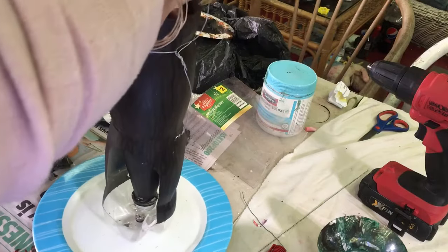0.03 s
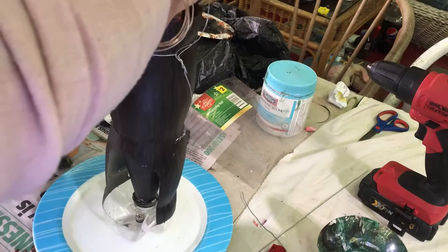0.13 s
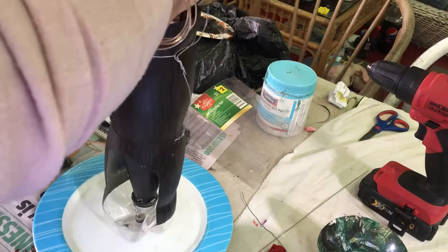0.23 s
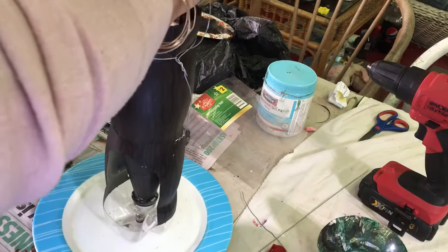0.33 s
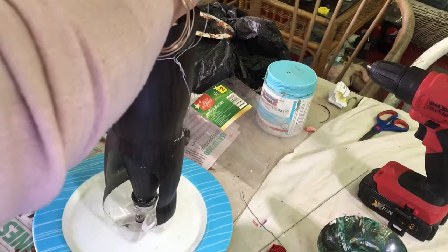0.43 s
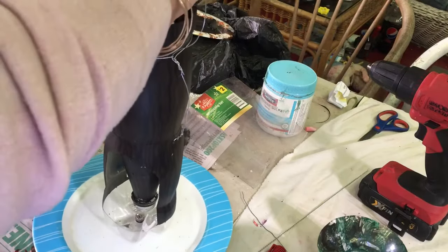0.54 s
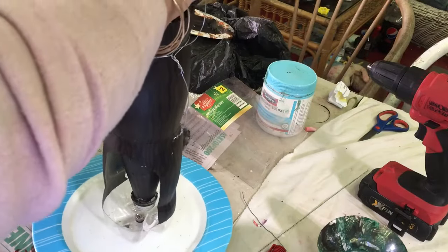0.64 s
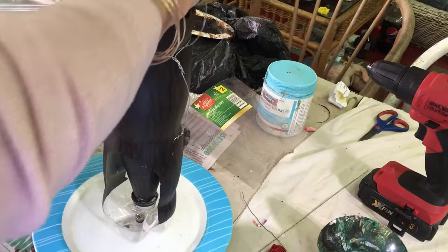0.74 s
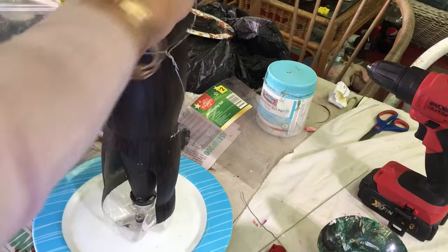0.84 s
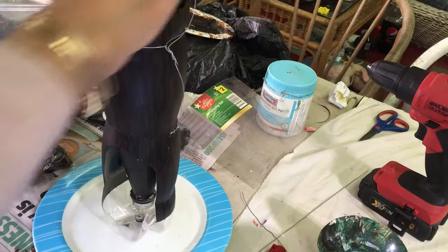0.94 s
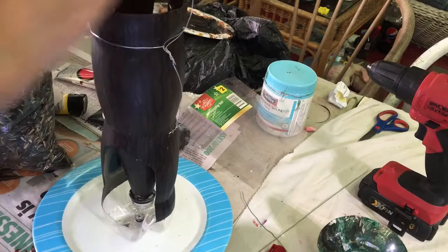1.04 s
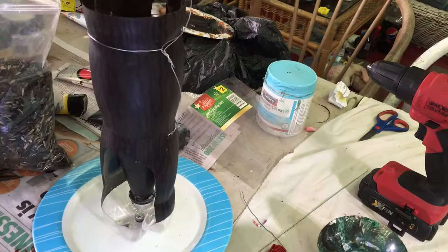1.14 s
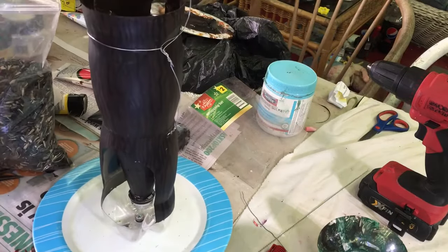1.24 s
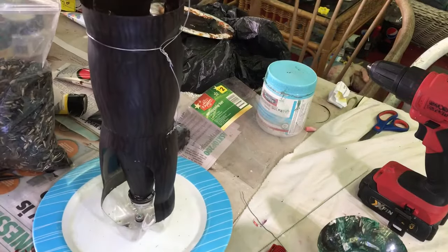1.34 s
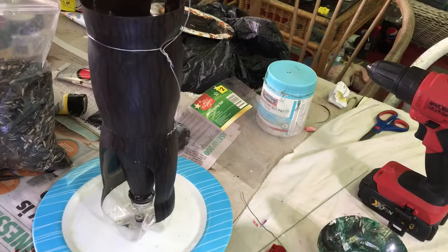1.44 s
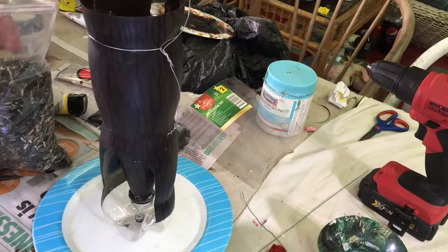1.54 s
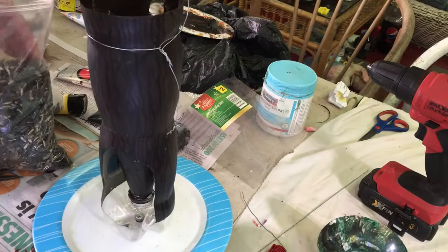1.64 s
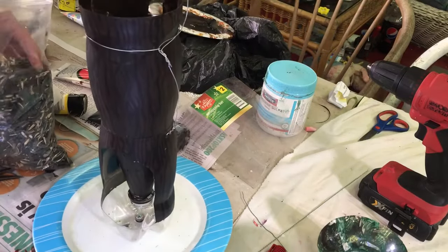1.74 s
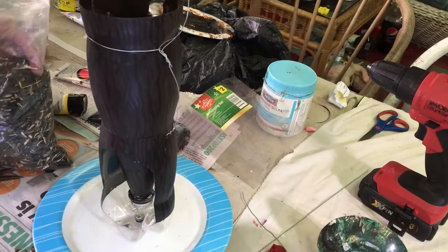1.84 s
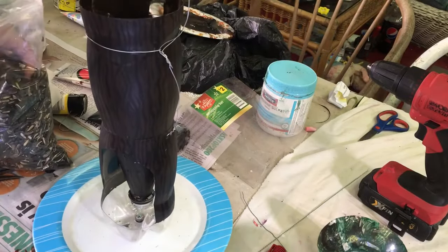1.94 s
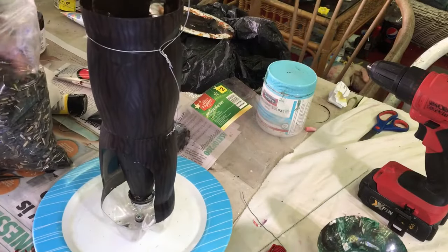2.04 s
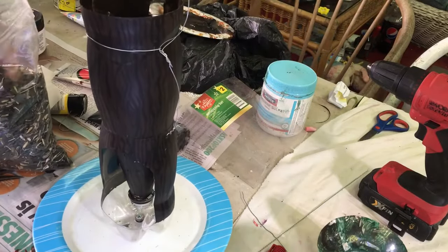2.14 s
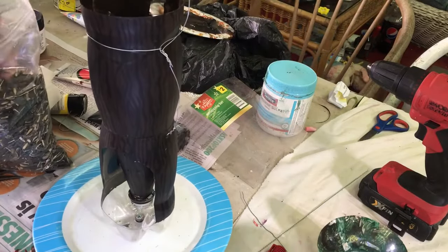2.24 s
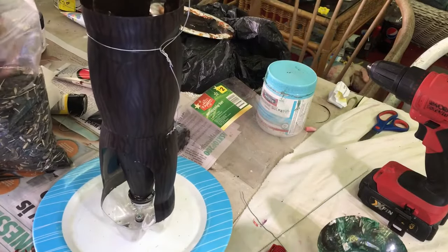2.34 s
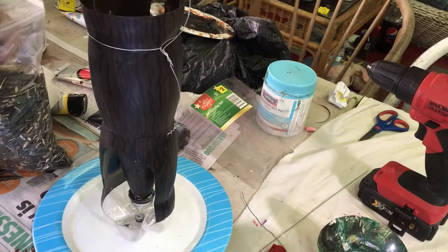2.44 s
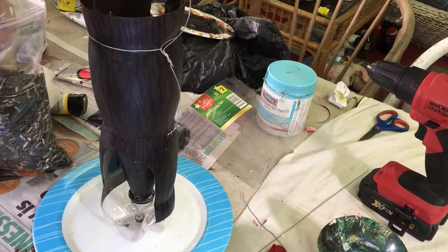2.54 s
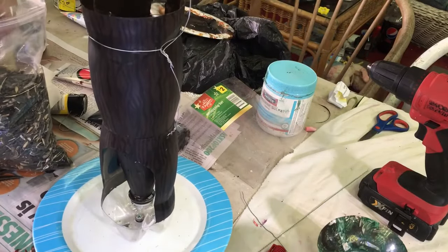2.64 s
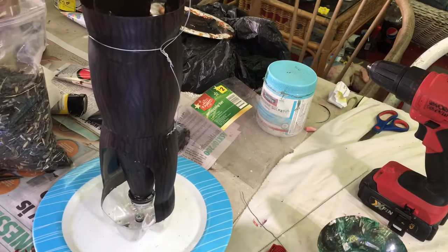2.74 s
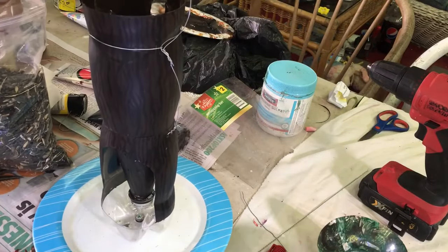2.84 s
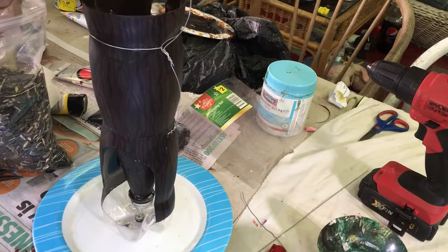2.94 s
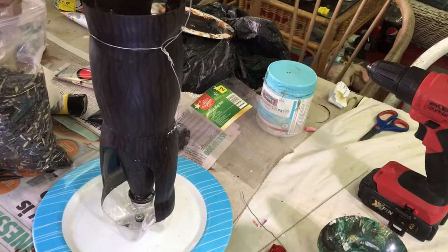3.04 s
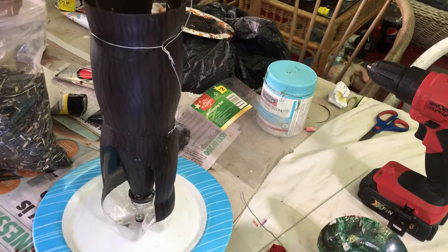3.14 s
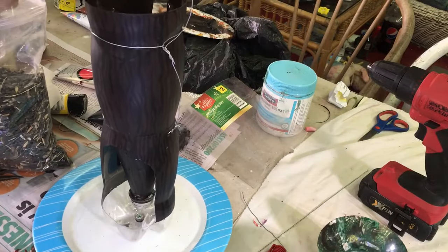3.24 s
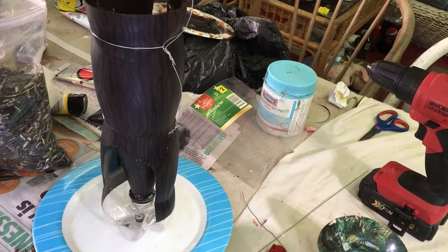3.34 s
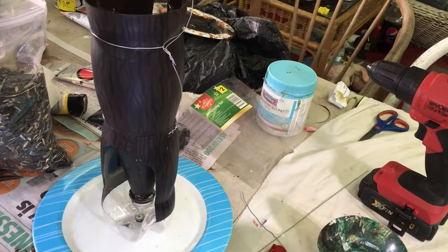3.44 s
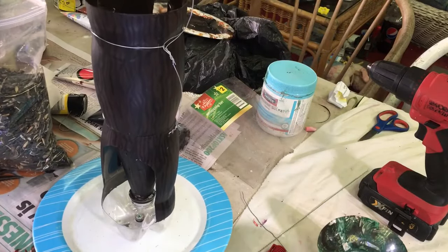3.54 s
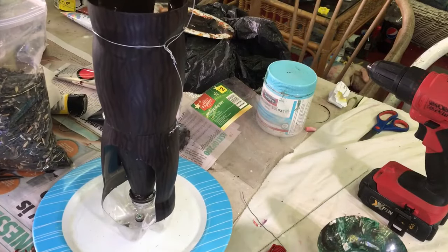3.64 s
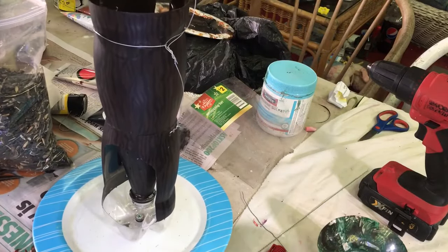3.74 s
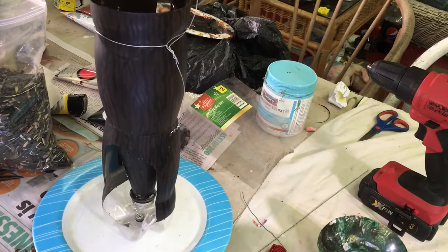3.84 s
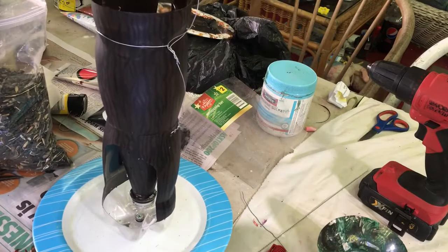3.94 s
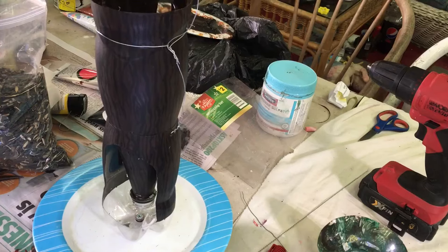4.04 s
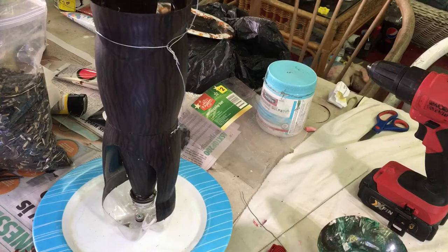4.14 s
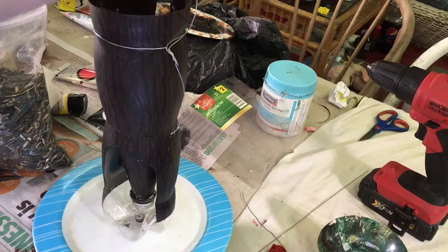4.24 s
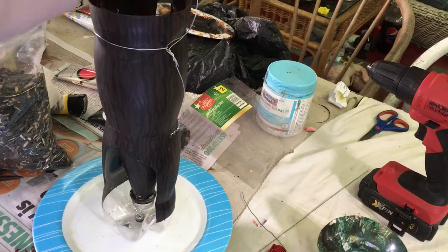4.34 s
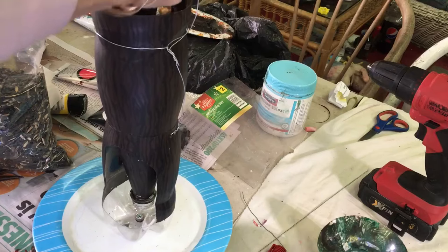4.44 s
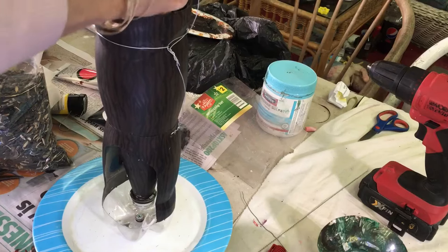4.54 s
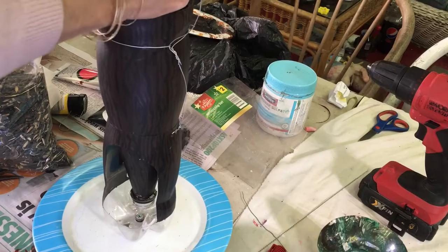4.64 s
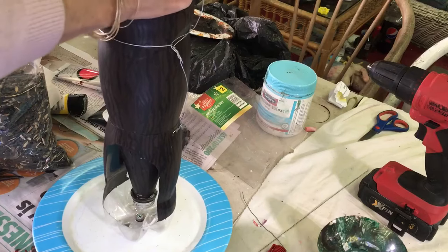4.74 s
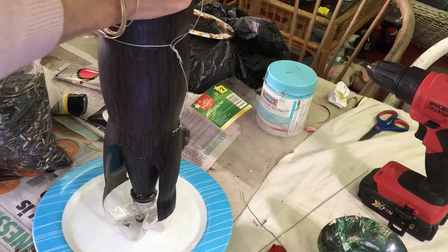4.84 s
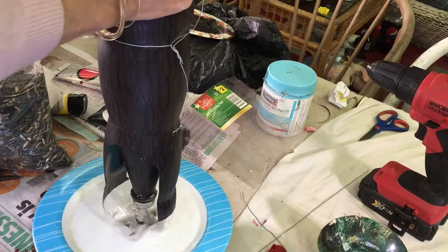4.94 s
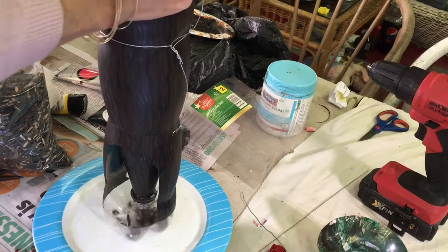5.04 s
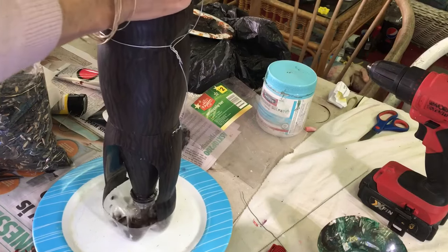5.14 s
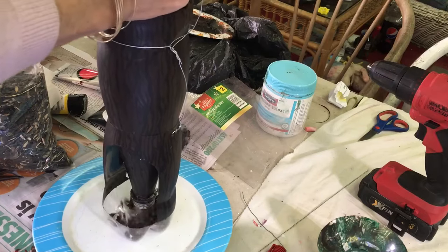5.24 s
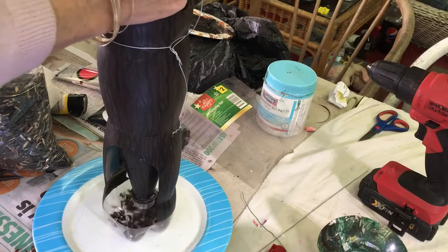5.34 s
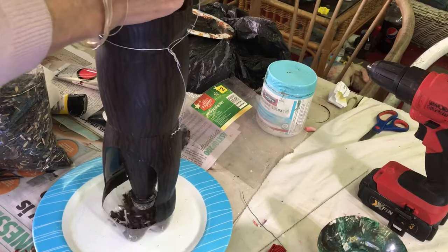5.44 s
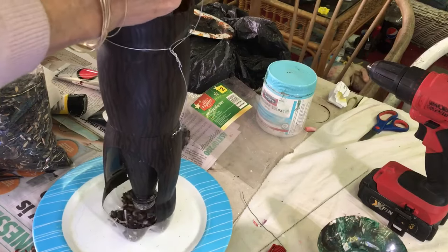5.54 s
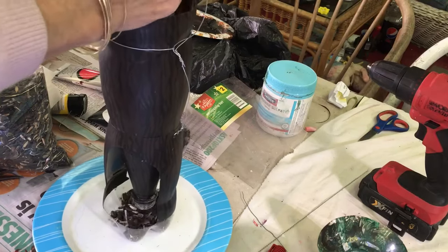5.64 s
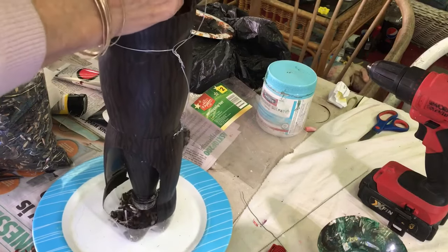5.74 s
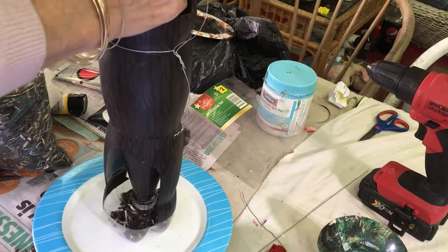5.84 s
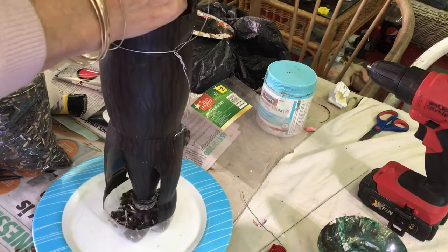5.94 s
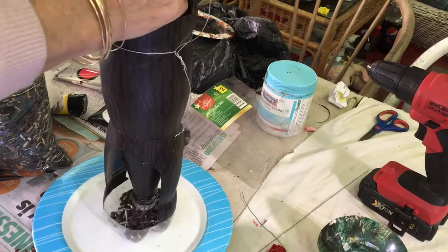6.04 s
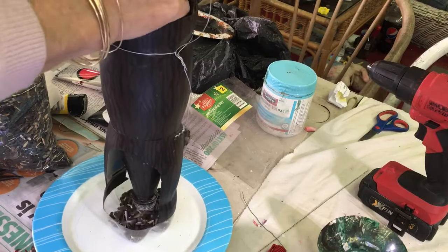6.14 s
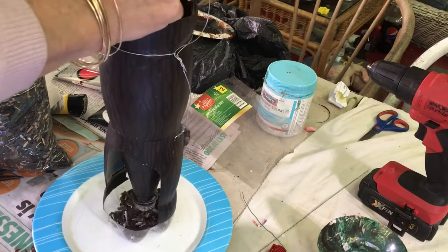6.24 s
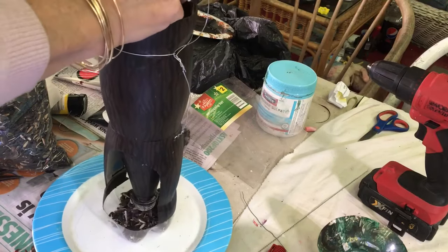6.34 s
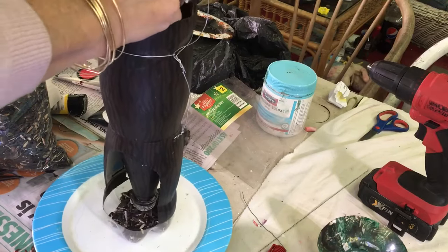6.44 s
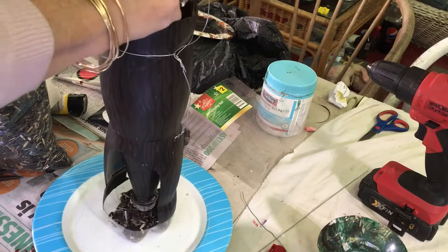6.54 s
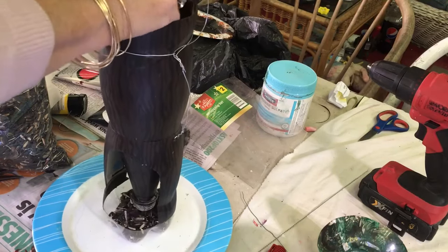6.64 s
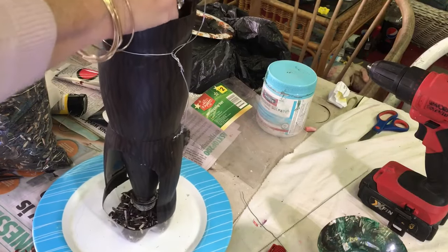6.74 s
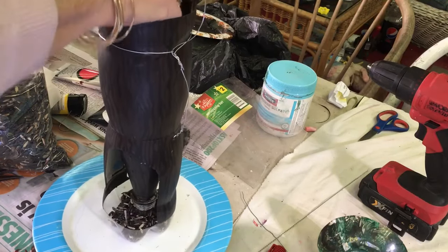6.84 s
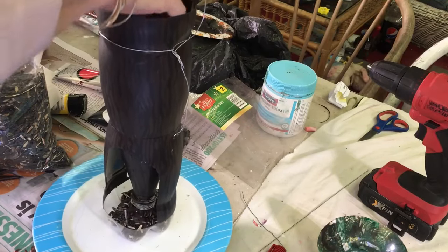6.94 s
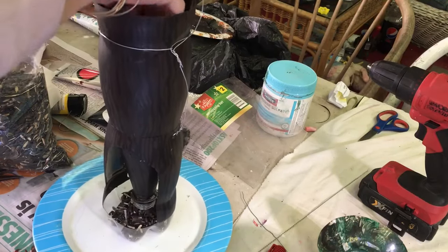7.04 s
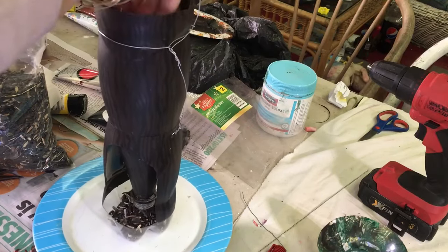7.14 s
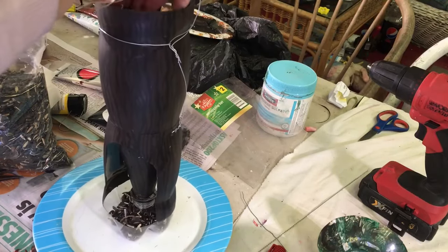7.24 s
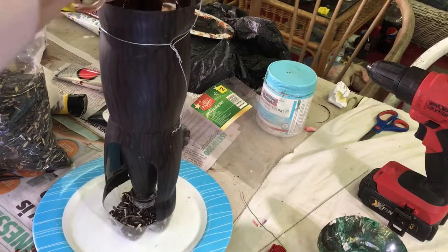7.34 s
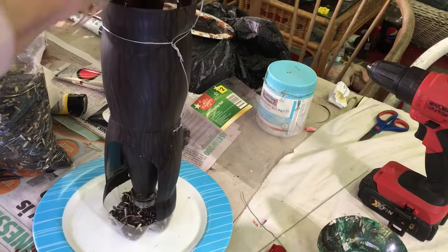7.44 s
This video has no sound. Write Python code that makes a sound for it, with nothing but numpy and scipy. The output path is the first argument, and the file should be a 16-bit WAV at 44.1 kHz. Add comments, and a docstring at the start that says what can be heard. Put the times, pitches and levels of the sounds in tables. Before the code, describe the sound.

Crisp plastic bag crinkling and snapping, a brief pause, then a handful of dry seeds pours and ticks into a plastic bottle on a quiet porch.

```python
"""On a porch, a hand digs into a stiff plastic bag of seeds, then lets a handful stream into a bottle feeder.
The seeds are noise ticks that ring the plastic wall and the air over the heap; the bag is clumped crackle,
sliding grain, low rustle and single snaps. Knocks and bangles are short noise bursts into damped modes.
Far off, a crow caws (pulse trains through throat resonances) over a low outdoor rumble of shaped noise."""
import sys
import numpy as np
from scipy import signal
from scipy.fft import rfft, irfft
from scipy.io import wavfile
from scipy.ndimage import uniform_filter1d

SR = 44100
rng = np.random.default_rng(int(sys.argv[2]) if len(sys.argv) > 2 else 0)


def unload_audio(sound):
    """Save the sound as a 16-bit wav file, at the path given as the first command line argument."""
    columns = np.transpose(np.atleast_2d(sound))
    # keep every value between -1 and 1, then stretch to whole-number steps
    steps = np.round(np.clip(columns, -1, 1) * 32767)
    wavfile.write(sys.argv[1], SR, steps.astype(np.int16))


def boost(x):
    """Linear amplitude factor 10**(x/20) for a level x in decibels (scalar or array-like)."""
    u = np.asarray(x, float) / 20
    return 10 ** u


N = 329868  # length in samples


def rms_one(x):
    """Normalises a layer to an rms of 1, so that its fader sets the level."""
    return x / np.sqrt(np.mean(x ** 2) + 1e-20)


def coloured(x, spectrum):
    """EQ curve as a causal minimum-phase filter, so that attacks stay sharp."""
    size = 8192
    hz, db = np.transpose(spectrum)
    grid = np.maximum(np.arange(size // 2 + 1) * SR / size, 1)
    log_gain = np.interp(np.log(grid), np.log(hz), db) * np.log(10) / 20
    cepstrum = irfft(log_gain)
    # folding the cepstrum forward in time makes the phase minimal
    cepstrum[1:size // 2] *= 2
    cepstrum[size // 2 + 1:] = 0
    impulse = irfft(np.exp(rfft(cepstrum)))
    return signal.fftconvolve(x, impulse)[:N]


def drift(rate_hz):
    """Slow random modulation with spread 1: noise low-passed at rate_hz, computed at SR / 40."""
    r = np.exp(-80 * np.pi * rate_hz / SR)
    noise = rng.standard_normal(N // 40 + 2002)
    slow = signal.lfilter([1], [1, -2 * r, r * r], noise)[2000:]  # skips the filter's run-in
    return np.interp(np.arange(N) / 40, np.arange(len(slow)), rms_one(slow))


def resonance(x, hz, width_hz):
    """One damped mode as a two-pole resonator; a wider peak dies sooner."""
    r = np.exp(-np.pi * width_hz / SR)
    poles = [1, -2 * r * np.cos(2 * np.pi * hz / SR), r * r]
    return signal.lfilter([(1 - r * r) / 2, 0, (r * r - 1) / 2], poles, x + 1e-18)


def modes_of(x, body):
    """A body as parallel modes with alternating sign."""
    return sum(boost(db) * resonance(x, hz, width_hz) * (-1) ** k
               for k, (hz, width_hz, db) in enumerate(body))


def band(x, low_hz, high_hz):
    """Band-pass for one part of a sound."""
    return signal.sosfilt(signal.butter(2, [low_hz, high_hz], "band", fs=SR, output="sos"), x)


def bursts(clicks, ms):
    """Every click becomes a puff of noise that decays with time constant ms."""
    r = np.exp(-1000 / (ms * SR))
    return signal.lfilter([1], [1, -r], clicks + 1e-18) * rng.standard_normal(N)


def grains(per_s, spread_db, clump_db, clump_hz):
    """Random contacts in clumps, a few much stronger than the rest; denser ones are turned down to balance."""
    sizes = boost(spread_db * np.minimum(rng.exponential(1, N), 4))
    dense = per_s * boost(clump_db * drift(clump_hz))
    struck = rng.random(N) < dense / SR
    return sizes * struck / np.sqrt(np.maximum(per_s, 20))


def puffs(times, levels_db, ms, rise_ms, slips):
    """One dying noise puff per blow, broken into micro-contacts (slips sets how rough), energy normalised."""
    t_ms = np.arange(int(8 * ms * SR / 1000) + 8) * 1000 / SR
    draws = rng.standard_normal((len(times), 2, len(t_ms)))
    lumps = np.exp(slips * uniform_filter1d(draws[:, 1], size=16, axis=1) * 4)
    envelope = np.exp(-t_ms / ms) * (1 - np.exp(-t_ms / max(rise_ms, .01)))
    shapes = draws[:, 0] * lumps * envelope
    shapes /= np.sqrt(np.sum(shapes ** 2, axis=1, keepdims=True) / (ms * SR / 2000))
    out = np.zeros(N + len(t_ms))
    for s, level_db, shape in zip(times, levels_db, shapes):
        start = int(s * SR)
        out[start:start + len(t_ms)] += boost(level_db) * shape
    return out[:N]


def hits(s, levels_db, edges_hz, ms, gains_db, slips):
    """Blows in a middle, a dull and a bright part, the dull one lasting longest."""
    return sum(band(puffs(s, level_db + gain_db, length_ms, rise_ms=1.0, slips=slips), low_hz, high_hz)
               for level_db, (low_hz, high_hz), length_ms, gain_db in zip(levels_db, edges_hz, ms, gains_db))


def swells(starts, lengths, levels_db, rise, sag, fall):
    """Level in dB of overlapping swells that rise, sag slowly while they last and fall away (slopes in dB/s)."""
    t, power = np.arange(0, N + 64, 64) / SR, 1e-12
    for s, length, level_db in zip(starts, lengths, levels_db):
        before, after, past_end = (np.maximum(x, 0) for x in (s - t, t - s, t - s - length))
        lost_db = rise * before + sag * after + fall * past_end
        power = power + boost(2 * (level_db - lost_db))
    return np.interp(np.arange(N) / SR, t, 10 * np.log10(power))


# spectrum of the outdoor rumble: f/Hz, density/dB per Hz
AIR_COLOUR = [(15, -45.5), (25, -11.5), (70, -0.5), (107, -21), (137, -11.5), (205, -22.5), (307, -19),
              (403, -26), (500, -29), (557, -26.5), (729, -31), (1040, -31), (1320, -33), (13800, -46),
              (15800, -58)]


def air():
    """Low outdoor rumble: shaped noise that wavers slowly in level."""
    waver_db = 1.0 * drift(3)
    return boost(-50 + waver_db) * rms_one(coloured(rng.standard_normal(N), AIR_COLOUR))


# caws: t/s, length/s, starting f/Hz, sag/Hz per s (negative rises at first), level/dB
CAWS = [(0.618, 0.11, 298, 40, -63.5), (1.304, 0.094, 305.7, 204.4, -59.5), (2.758, .26, 322.3, 70, -62),
        (3.657, 0.11, 330, 129.5, -58), (4.642, 0.45, 404.6, -30, -62.5)]
# which of the throats gives each caw: throat index
CALLERS = [0, 0, 1, 0, 2]
# throat resonances of three birds: f/Hz, width of each of two passes/Hz, level of the mode/dB
THROATS = [
    [(1280, 300, -8), (1930, 330, 0), (2250, 250, -12)],
    [(1250, 300, -5), (1800, 350, 0), (2150, 350, -1)],
    [(820, 200, -8), (1220, 200, 0), (1700, 300, -16)],
]
CAW_DROOP_HZ_PER_S2 = 220  # the sag quickens as breath runs out
CAW_RISE_DB_PER_S, CAW_FALL_DB_PER_S = 202, 178


def crow():
    """Slightly uneven pulses through a throat, sagging in pitch; distance leaves only the strong overtones."""
    out, t = 0, np.arange(N) / SR
    for (s, length, start_hz, sag, peak_db), bird in zip(CAWS, CALLERS):
        since = np.clip(t - s, -.1, length + .1)
        hz = start_hz - sag * since - CAW_DROOP_HZ_PER_S2 * since ** 2
        level_db = swells([s], [length], [peak_db], CAW_RISE_DB_PER_S, 0, CAW_FALL_DB_PER_S)
        cycles = np.cumsum(hz * (1 + .003 * drift(30))) / SR
        # one pulse per cycle, each of its own strength
        pulses = np.diff(np.floor(cycles), prepend=0) * (1 + .5 * rng.standard_normal(N))
        voiced = sum(boost(db) * resonance(resonance(pulses, f, width_hz), f, width_hz)
                     for f, width_hz, db in THROATS[bird])
        flutter_db = 2.6 * drift(25)  # from the air on the way
        out = out + boost(level_db + flutter_db) * rms_one(voiced)
    return out


PORCH_T60_S, PORCH_CUT_HZ = 0.16, 4500  # decay of the dull part; crossover to the treble


def porch(x):
    """Near walls answer with a short noise tail that loses its treble first."""
    t = np.arange(int(.6 * SR)) / SR
    noise = rng.standard_normal(len(t))
    dull = signal.sosfilt(signal.butter(1, PORCH_CUT_HZ, fs=SR, output="sos"), noise)
    treble = noise - dull
    tail = dull * boost(-60 * t / PORCH_T60_S) + treble * boost(-60 * t / (0.3 * PORCH_T60_S))
    tail *= t > .004  # pre-delay
    return signal.fftconvolve(x, tail / np.sqrt(np.sum(tail ** 2)))[:N]


# bangles touching: t/s, level/dB, tilt/dB per octave (a broad touch favours the low modes)
JINGLES = [(1.113, -44, -2), (1.155, -51, 0), (1.168, -32, 7), (1.176, -33, 5), (1.185, -48, 4.5),
           (1.198, -44, -4), (1.224, -47, 5), (1.245, -51, 2), (3.06, -62, -17), (3.08, -59, -17),
           (3.16, -68, -5)]
# bangle modes: f/Hz, level/dB, t60/s
BANGLE_MODES = [(4700, -22, .12), (6280, -20, .15), (7290, -18, .12), (8600, -22, .1), (9570, -12, .1),
                (10790, -8, .12), (11780, -12, .1), (13000, -6, .08), (14150, -7, .1), (14960, 0, .09),
                (15110, -2, .1)]


def bangles():
    """Each touch is a quick chatter of contacts that rings every metal mode with a strength of its own."""
    s, level_db, tilt_db = np.transpose(JINGLES)
    luck_db = rng.normal(0, 4.0, (len(s), len(BANGLE_MODES)))
    out = 0
    for k, (hz, mode_db, t60_s) in enumerate(BANGLE_MODES):
        touch_db = level_db + mode_db + tilt_db * np.log2(hz / 15000) - 17 + luck_db[:, k]
        chatter = puffs(s, touch_db, ms=0.99, rise_ms=0.17, slips=0.53)
        r, w = boost(-60 / (t60_s * SR)), 2 * np.pi * hz / SR
        out = out + signal.lfilter([0, np.sin(w)], [1, -2 * r * np.cos(w), r * r], chatter + 1e-18)
    scuff = puffs(s, level_db - 4, ms=9.0, rise_ms=0.26, slips=0.54)
    return out + band(scuff, 6900, 15800)


# bumps against bottle and table: t/s, low thud level/dB, hollow knock level/dB
KNOCKS = [(0.144, -47, -48), (0.869, -38, -24), (.873, -35, -25.5), (3.433, -39.5, -58), (4.025, -34, -53),
          (7.268, -73, -52)]
# low modes of the table: f/Hz, width/Hz, level/dB
TABLE_MODES = [(184, 68, -1), (330, 55, 1), (419, 35, -1)]
# hollow modes of the bottle: f/Hz, width/Hz, level/dB
HOLLOW_MODES = [(500, 46, 10.5), (805, 810, 0.5), (1070, 256, 10), (1480, 234, 4), (2000, 210, 0.5),
                (2430, 340, -4), (3910, 200, -14)]


def knocks():
    """A damped thud of the table and a hollow, noisy knock of the bottle with a looser rattle after it."""
    s, thud_db, hollow_db = np.transpose(KNOCKS)
    push = np.zeros(N)
    push[(s * SR).astype(int)] = boost(thud_db + 47)  # one soft shove moves every low mode alike
    thud = modes_of(band(push, 110, 840), TABLE_MODES)
    blow = puffs(s, hollow_db + 20, ms=3.4, rise_ms=0.33, slips=0.065)
    rattle = puffs(s, hollow_db - 7, ms=38.0, rise_ms=4.4, slips=0.22)
    return thud + modes_of(blow + rattle, HOLLOW_MODES)


# the hand grips bag or bottle: t/s, length/s, crackle level/dB, weight/dB (more low rustle, less fine sliding)
GRIPS = [(0, 0.013, -45, 2.5), (.14, 0.046, -51.5, 6.5), (.25, 0.032, -51, -5.5), (.42, 0.078, -51.5, -1.5),
         (.78, 0.049, -56, -10), (.9, 0.032, -53, 6), (1.02, 0.022, -58, -7.5), (1.16, 0.079, -58.5, -2),
         (1.25, .1, -62, 4), (1.582, 0.11, -35, -2.5), (1.74, 0.031, -32, 1), (1.822, 0.097, -30.5, 0),
         (1.98, 0.21, -38.5, 0), (2.2, 0.13, -42, 3), (2.33, .42, -43.5, -2.5), (2.8, 0.22, -66, -9)]
# snaps of the film and taps on the bottle: t/s, level/dB, dull part/dB, bright part/dB
SNAPS = [(0.1429, -39.5, 13, -1), (0.155, -43, 0, 3), (0.172, -37.5, -8, -3), (0.241, -33.5, 2, -26),
         (0.2923, -33, -2, -19), (0.4138, -43.5, -4, 5), (0.454, -40, -16, -21), (0.5053, -36, -13, 4),
         (0.622, -29.5, -24, -27), (0.77, -36, -16, -7), (0.7812, -32, -8, -2), (0.82, -40, -18, -4),
         (0.925, -43, -15, 2), (1.018, -49, -15, 0), (1.3568, -37, -3.5, 2), (1.546, -22, -21, -8),
         (1.5754, -22, -37, -1), (1.6023, -15.5, -8, -12.5), (1.6483, -12, -12, -5), (1.6583, -9, -11.5, 4),
         (1.6862, -9.5, -12, -0.5), (1.803, -21, -23, -7), (1.834, -17, 0, 3.5), (1.849, -20, -12, 4),
         (1.8635, -13.5, -17, -4), (1.8991, -10.5, -12.5, 1.5), (1.914, -22, -15, -6),
         (1.9503, -9.5, -11, -5), (1.9689, -17, -27, 1), (2.0267, -23, 3, -8), (2.04, -20.5, -15, -19),
         (2.073, -16.5, -18, -4), (2.136, -28, 1.5, -30), (2.1494, -30, 0, -18), (2.197, -31, -10, -5),
         (2.2098, -22, -14, -11), (2.2198, -17.5, -10, -1.5), (2.2402, -21.5, -2, 4.5),
         (2.2576, -9.5, -24, 1.5), (2.3035, -20.5, -4, -11), (2.3738, -27.5, -9, -25.5),
         (2.4187, -21.5, -13, -21), (2.4346, -30.5, 1.5, -11), (2.507, -35.5, 5, -19),
         (2.5775, -34.5, 3.5, -9), (2.652, -35, 3, -4), (2.7293, -24, -6.5, 2.5), (2.744, -28, -5, -22),
         (2.963, -35.5, -23, -27), (3.029, -44.5, -15, -1), (3.0602, -44, -8, -3),
         (3.3344, -21.5, -19.5, -21), (3.8296, -48, -3, -4), (4.0234, -22.5, -13.5, -22)]
# spectrum of the crackling film: f/Hz, density/dB per Hz
FILM_COLOUR = [(410, -30.5), (700, 4), (762, -14.5), (996, 7), (2390, 6), (2870, -8.5), (3480, -1.5),
               (9000, -11.5), (11700, -79.5), (19800, -120)]
# spectrum of seeds sliding over each other: f/Hz, density/dB per Hz
SLIDE_COLOUR = [(1760, -40), (3000, -3.5), (5530, -10), (7560, -13), (9190, -11.5), (15800, -12)]
# spectrum of the heavy bag's low rustle: f/Hz, density/dB per Hz
RUSTLE_COLOUR = [(47, -49), (80, -1.5), (270, -6), (384, -2.5), (699, -11.5), (758, -21.5), (900, -13.5),
                 (1170, -53), (1980, -120)]
GRIP_SLOPES = 354, 10, 164  # rise, sag, fall in dB/s
SLIDE_UNDER_DB, RUSTLE_UNDER_DB = 7, 5  # below the crackle, before the weight


def bag():
    """Creases snap in clumps; seeds slide over each other and the heavy bag rustles low as the hand digs."""
    s, length, grip_db, weight_db = np.transpose(GRIPS)
    crackle_db = swells(s, length, grip_db, *GRIP_SLOPES)
    slide_db = swells(s, length, grip_db - SLIDE_UNDER_DB - weight_db, *GRIP_SLOPES)
    low_db = swells(s, length, grip_db - RUSTLE_UNDER_DB + weight_db, *GRIP_SLOPES)

    contacts = grains(np.full(N, 260.), spread_db=5.0, clump_db=3.0, clump_hz=25)
    crease = rng.integers(0, 8, N)  # each crease has its own size, hence its own pitch
    pings = sum(resonance(contacts * (crease == k), hz, hz / 1.2)
                for k, hz in enumerate(np.geomspace(1000, 6000, num=8)))
    crackle = bursts(contacts, ms=6.5) + boost(23.5) * pings
    crackle = boost(crackle_db) * rms_one(coloured(crackle, FILM_COLOUR))

    fine = grains(np.full(N, 2500.), spread_db=3.0, clump_db=2.0, clump_hz=20)
    slide = bursts(0.24 * contacts + fine, ms=1.0)
    slide = boost(slide_db) * rms_one(coloured(slide, SLIDE_COLOUR))

    lumps_db = 2.5 * drift(20)
    rustle = boost(low_db + lumps_db) * rms_one(coloured(rng.standard_normal(N), RUSTLE_COLOUR))

    s, level_db, dull_db, bright_db = np.transpose(SNAPS)
    snaps = hits(s, (level_db, level_db + dull_db, level_db + bright_db),
                 [(1100, 4450), (180, 740), (4630, 10100)],
                 ms=(1.8, 5.0, 1.2), gains_db=(6.0, 11.0, 3.0), slips=0.6)
    return crackle + slide + rustle + snaps


# gushes of seed sliding off the hand: t/s, length/s, level/dB
GUSHES = [(4.851, 0.027, -42.5), (4.99, 0.18, -23), (5.076, .19, -18), (5.292, .24, -20),
          (5.566, .11, -27.5), (5.739, .11, -23.5), (5.965, 0.099, -27.5), (6.085, 0.083, -26.5),
          (6.21, 0.091, -24.5), (6.33, .12, -36.5), (6.48, 0.063, -47), (6.623, 0.038, -39),
          (6.898, 0.041, -39.5), (6.989, 0.022, -33.5), (7.179, 0.029, -45)]


def gush_level():
    """Level in dB of the stream: each gush starts fast, sags a little and breaks off."""
    return swells(*np.transpose(GUSHES), rise=348.5, sag=15.5, fall=244.5)


# spectrum of the seed ticks: f/Hz, density/dB per Hz
SEED_COLOUR = [(120, -36.5), (200, -21.5), (372, -14), (416, -37.5), (499, -16), (719, -26.5),
               (1180, -11.5), (2230, -6.5), (3280, 0), (4640, -2.5), (9130, -6.5), (12700, -4.5),
               (15800, -10.5)]
# modes of the bottle wall: f/Hz, width/Hz, level/dB
WALL_MODES = [(1250, 200, -7), (1500, 250, -8), (2550, 300, -5), (3200, 350, -2), (3650, 350, 1),
              (4050, 400, -1), (5800, 600, -5), (6900, 600, -6), (9400, 700, -3), (11500, 900, -6)]


def stream(flow_db):
    """Each falling seed ticks on the wall and excites one of its modes; a fuller stream has more impacts."""
    per_s = 5000 * boost(.75 * (flow_db + 18))
    contacts = grains(per_s, spread_db=5.0, clump_db=1.0, clump_hz=45)
    ticks = rms_one(coloured(bursts(contacts, ms=.5), SEED_COLOUR))
    dealt = rng.integers(0, len(WALL_MODES), N)  # the mode each impact rings
    rings = sum(boost(db) * resonance(contacts * (dealt == k), hz, width_hz) * np.sqrt(SR / width_hz)
                for k, (hz, width_hz, db) in enumerate(WALL_MODES))
    return boost(flow_db) * (ticks + boost(-7.0) * rms_one(rings))


# seeds that strike the wall on their own: t/s, level/dB, bright part/dB
SEED_HITS = [(4.2735, -32, 7.5), (4.297, -42, -3), (4.3446, -32, 0), (4.3577, -31.5, 4), (4.4029, -27, 1.5),
             (4.5208, -29, 10.5), (4.548, -38.5, 9), (4.5813, -39.5, 9), (4.6673, -46, 10.5),
             (4.7516, -17.5, -7), (4.7762, -27.5, 2), (4.8198, -23.5, -1), (4.8531, -13.5, 13),
             (4.8738, -21, 4), (4.8937, -13, -3), (4.9104, -21, -16), (4.9334, -5, -12), (4.965, -6, 7),
             (5.0009, -6, 5.5), (5.0106, -8, -8), (5.0366, -4.5, 4), (5.052, -7.5, 9.5), (5.0617, 1, 2),
             (5.5232, -13, -24), (5.6047, -14, -15), (5.6506, -12, -2), (5.728, -13, -17),
             (5.8727, -15, -19), (5.9075, -17, -14), (5.92, -21, -12), (5.941, -22.5, -8), (5.957, -23, 0),
             (5.9677, -10.5, 0), (6.045, -16.5, 8.5), (6.087, -16, 1.5), (6.116, -4.5, -7),
             (6.1979, -11, -23), (6.31, -12.5, -2), (6.3524, -20, 2), (6.3772, -18, 1), (6.4006, -34, -2),
             (6.4113, -10, 4), (6.4468, -25, 8), (6.4759, -21.5, -1), (6.5173, -29.5, 0.5),
             (6.554, -35.5, -16), (6.602, -14.5, -10), (6.623, -28, 8), (6.6572, -28, -23.5),
             (6.7044, -26.5, -30), (6.719, -24, -14.5), (6.745, -37, 2), (6.7987, -38, -4),
             (6.8496, -32, -1), (6.8749, -17, -24), (6.884, -18.5, -20), (6.926, -15, -3.5),
             (6.9483, -21, -2), (6.9774, -4.5, -31), (6.9926, -14, 1), (7.024, -24, -16),
             (7.069, -28.5, 2.5), (7.0924, -30, 6.5), (7.145, -20, -3), (7.1543, -26, -13),
             (7.181, -23.5, 4.5), (7.21, -45.5, 15.5), (7.394, -34, -16), (7.4064, -30.5, -15)]
BOUNCE_S, BOUNCE_LOSS_DB = 0.011, 14.5  # means; each such seed touches once more
STRAY_OVER_DB, STRAY_SPREAD_DB, STRAY_BRIGHT_DB = 5.5, 2, -14.5  # big seeds, over the stream's level


def lone_seeds(flow_db):
    """Lone seeds, their bounces and big seeds scattered through the stream: three-part noise ticks."""
    s, level_db, bright_db = np.transpose(SEED_HITS)
    luck = rng.random((len(s), 2))
    bounce_s = s + BOUNCE_S * (.5 + luck[:, 0])
    bounce_db = level_db - BOUNCE_LOSS_DB * (.5 + luck[:, 1])

    stray_s = rng.uniform(GUSHES[0][0], N / SR - .1, size=110)
    extra_db = STRAY_SPREAD_DB * np.minimum(rng.exponential(1, len(stray_s)), 2)
    stray_db = flow_db[(stray_s * SR).astype(int)] + STRAY_OVER_DB + extra_db
    stray_bright_db = STRAY_BRIGHT_DB + 6.3 * rng.standard_normal(len(stray_s))

    s = np.r_[s, bounce_s, stray_s]
    level_db = np.r_[level_db, bounce_db, stray_db]
    bright_db = np.r_[bright_db, bright_db, stray_bright_db]
    return hits(s, (level_db, level_db, level_db + bright_db), [(2080, 6850), (1055, 6400), (7300, 15900)],
                ms=(1.1, 2.5, .9), gains_db=(5.0, -3.0, 5.0), slips=1.0)


HEAP_HZ, HEAP_WIDTH_HZ, HEAP_DB = 3680, 440, -7
FILL_FROM_S, FILL_S = 5.24, .5  # the heap builds up


def seeds():
    """Stream and lone seeds ring the thin wall; the air pocket over the heaped seed rings with every tick."""
    flow_db = gush_level()
    single = lone_seeds(flow_db)
    # where a seed lands picks a third of the modes
    spot = np.repeat(rng.integers(0, 3, N // 256 + 1), 256)[:N]
    wall = sum(modes_of(single * (spot == k), WALL_MODES[k::3]) for k in range(3))
    # the thin wall radiates no bass from so light a blow
    ticking = stream(flow_db) + band(single + boost(9.5) * wall, 1300, 22000)
    filled = np.clip((np.arange(N) / SR - FILL_FROM_S) / FILL_S, 0, 1)
    into_heap = filled * boost(5.0 * drift(70)) * ticking
    return ticking + boost(HEAP_DB) * resonance(into_heap, HEAP_HZ, HEAP_WIDTH_HZ)


def scene():
    """Mixes rumble and crow behind the close sounds; the porch answers the far ones more strongly."""
    far = crow()
    far = far + boost(-5) * porch(far)
    near = bangles() + knocks() + bag() + seeds()
    near = near + boost(-14.5) * porch(near)
    return (air() + far + near)[None]


def top_cut(x):
    """Nothing passes above the cut-off."""
    return signal.sosfilt(signal.butter(12, 16470, fs=SR, output="sos"), x)


def record(dry):
    """The microphone drops the deepest bass and the top; the loudest ticks are rounded off at full scale."""
    heard = boost(-3.5) * dry
    heard = signal.sosfilt(signal.butter(8, 40, "highpass", fs=SR, output="sos"), heard)
    heard = signal.sosfilt(signal.cheby2(10, 30, 16100, fs=SR, output="sos"), heard)
    rounded = heard / (1 + heard ** 4) ** .25
    return top_cut(rounded)


dry = scene()
out = record(dry)
unload_audio(out)
```